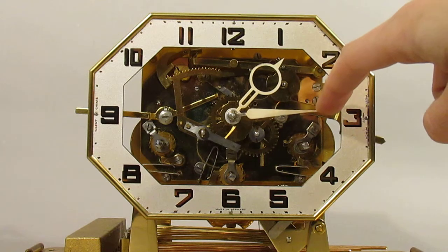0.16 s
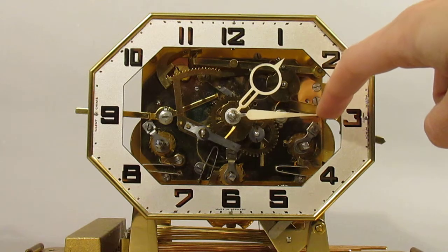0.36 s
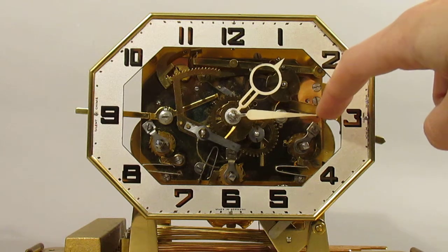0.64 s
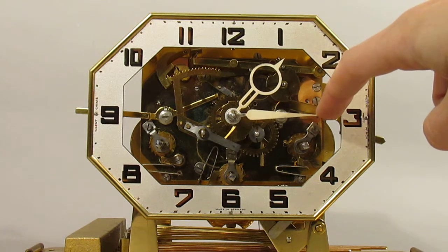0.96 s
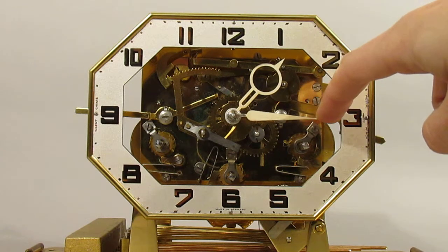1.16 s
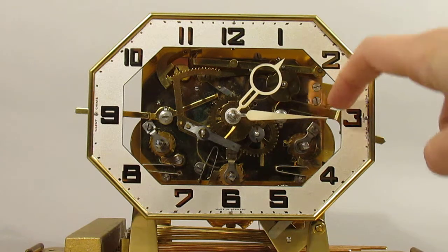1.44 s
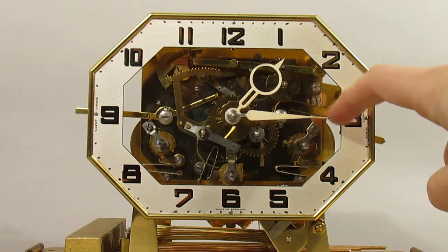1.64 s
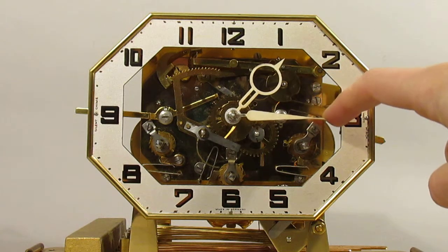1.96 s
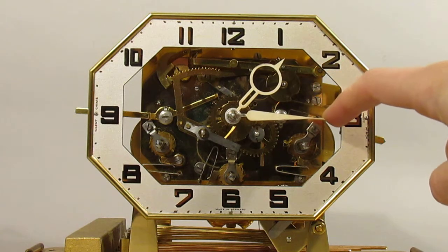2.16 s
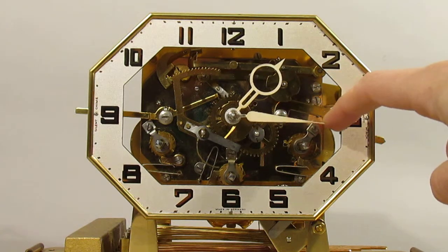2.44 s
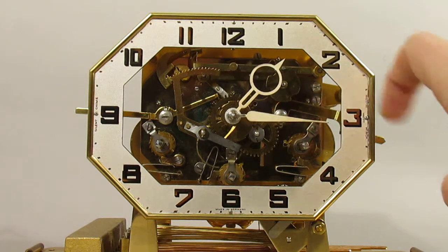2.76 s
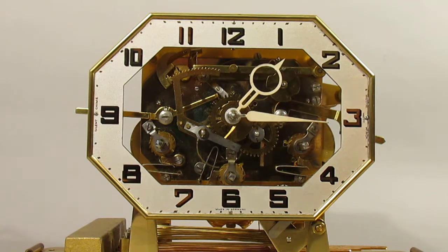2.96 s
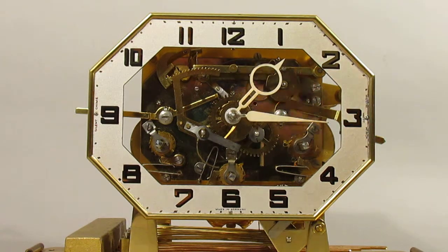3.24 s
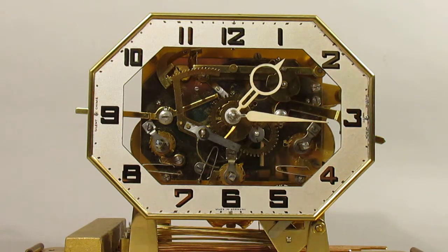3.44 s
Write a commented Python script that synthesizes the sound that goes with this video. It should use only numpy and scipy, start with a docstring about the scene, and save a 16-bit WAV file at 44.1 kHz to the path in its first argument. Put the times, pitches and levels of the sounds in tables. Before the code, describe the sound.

Clock gears released: faint hum and tiny motor ticking, light metal rubs, one crisp click and brief scrape, then an accelerating fine rattle merging into a buzzing whir, close microphone, small quiet room.

```python
"""Clock lever snap and gear-train whir

A finger pushes the minute hand of an open brass clock, close by in a quiet room with a low hum.
The hand rubs softly (grainy filtered noise), then a lever snaps over and scrapes along its cam
(noise bursts, ringing modes, noise). A pawl rattles over a wheel that gathers speed (noise ticks),
and the freed gear train whirs on, ever faster (beats timed by an accelerating phase).
An idling motor ticks faintly throughout."""
import sys
import numpy as np
from scipy import signal
from scipy.fft import rfft, irfft, next_fast_len
from scipy.io import wavfile
from scipy.ndimage import map_coordinates

SR = 44100
rng = np.random.default_rng(int(sys.argv[2]) if len(sys.argv) > 2 else 0)


def unload_wav(signal):
    """Save mono or channel-first audio to the path in sys.argv[1] as 16-bit WAV at rate SR, clipped to [-1, 1]."""
    wavfile.write(
        sys.argv[1],
        SR,
        np.round(np.clip(np.atleast_2d(signal).T, -1, 1) * 32767).astype(np.int16),
    )


N = 158319

# All colours and mode levels are relative; side_db is left over right.
# Room air spectrum: [freq_hz, level_db]
AIR_COLOUR = [(15, -27), (25, -17), (41, -2.5), (52, -7.5), (66, -8), (84, -14), (104, -4), (123, -2),
              (137, -10.5), (152, -14.5), (194, -7.5), (228, -12.5), (276, -11), (361, -17.5), (654, -25.5),
              (1150, -26), (2200, -32.5), (2460, -32), (2660, -35), (9990, -38), (15800, -42)]
# Left-right likeness of the air: [freq_hz, likeness]
AIR_LIKENESS = [(40, 0.64), (130, 0.029), (290, 0.2), (640, -0.16), (1400, -0.082), (3000, 0.014),
                (15000, 0.081)]
# Wavering hum and whine: [centre_hz, rms_db, half_width_hz]
HUM_BANDS = [(40.5, -72, 9.9), (120.8, -63, 5.9), (202, -67, 4.4), (1167, -78.5, 12.5), (2479, -76, 29)]
AIR_RMS_DB = -51.5
MAINS_HZ, MAINS_RMS_DB = 120, -60

MOTOR_FIRST_S, MOTOR_TICKS_PER_S = 0.029, 30
MOTOR_HZ, MOTOR_HALF_WIDTH_HZ, MOTOR_LEVEL_DB, MOTOR_T60_S = 7820, 310, -67.5, 0.019

# Rubs of the hand and its arbor: [peak_s, level_db, rise_s, fall_s, centre_hz, width_octaves]
# rise_s and fall_s: time per 20 dB
RUB_STROKES = [(1.57, -58, 0.058, 0.07, 10600, 0.41), (1.585, -50, 0.0087, 0.01, 11700, .16),
               (1.594, -63, .02, .025, 3950, 0.22), (1.661, -55.5, 0.026, 0.03, 5000, 1.0),
               (1.673, -53.5, 0.03, 0.014, 10800, .025), (1.735, -65.5, 0.015, 0.075, 3920, .4),
               (2.404, -57, 0.028, 0.21, 8800, 0.3), (3.244, -52.5, 0.011, 0.13, 7640, 0.43),
               (3.412, -50, 0.0089, 0.018, 3000, 0.52), (3.585, -52, 0.051, 0.086, 8050, 0.63)]
# Broad part of each rub: [freq_hz, level_db]
RUB_BODY_COLOUR = [(800, -5.5), (2000, -3.5), (3200, -0.5), (4000, 2.5), (5600, -9), (8000, 1),
                   (12500, -10), (15000, -28)]
RUB_BODY_REL_DB = -3.5

# Lever contacts: [start_s, relative_db, side_db]
LEVER_CONTACTS = [(2.3944, -33, -3), (2.4579, -10.5, -1), (2.4598, -23, 4), (2.5046, -27, 1),
                  (2.5098, -28.5, 5)]
# Lever contact spectrum: [freq_hz, level_db]
LEVER_COLOUR = [(290, -38), (500, -20), (988, -16.5), (2150, -23), (3250, -11), (3800, -19), (4300, -9.5),
                (4900, -18), (6140, -3), (6700, -14), (7310, -0.5), (8960, -3), (13400, -4), (15200, -11),
                (16000, -17)]
# Frame modes jolted by the snap: [freq_hz, level_db, t60_s]
FRAME_MODES = [(235.9, -44, 0.33), (309, -42.5, 0.18), (446, -53, 0.091), (617, -59, 0.57),
               (746, -49, 0.079), (893, -56, 0.31), (1047, -55.5, 0.083), (1234, -55, 0.22),
               (2100, -58, 0.18)]
# Hard crack of the lever tip: [freq_hz, level_db, t60_s]
SNAP_MODES = [(9100, -8, 0.002), (12000, -17, .003)]
# Lever sliding on its cam: [time_s, level_db]
SLIDE_LEVEL = [(2.456, -90), (2.461, -50.5), (2.488, -44.5), (2.497, -47.5), (2.511, -47.5), (2.52, -72),
               (2.545, -72), (2.57, -68.5)]
# Slide spectrum: [freq_hz, level_db]
SLIDE_COLOUR = [(240, -28), (400, -16), (616, -7), (1160, -13), (1380, -8.5), (1510, -18), (4180, -7),
                (7060, -25.5), (9040, -10), (14600, -19.5), (16000, -35)]
SNAP_S = 2.4580
LEVER_GAIN_DB, CRACK_T60_S = -4.5, 0.0041
CHATTER_REL_DB, CHATTER_T60_S = -9, 0.019

# Pawl dropping off each tooth: [start_s, relative_db, knock_rel_db]
TOOTH_DROPS = [(2.4476, -28.5, -27.5), (2.4735, -29, -27), (2.4998, -30, -27.5), (2.523, -35, -30),
               (2.545, -31.5, -29), (2.5651, -34, -33), (2.5832, -30.5, -29.5), (2.6006, -31.5, -25),
               (2.6162, -28.5, -28), (2.6299, -32, -24), (2.644, -35, -24), (2.6568, -34, -22),
               (2.6685, -34, -21.5), (2.691, -37.5, -19.5), (2.7014, -37.5, -19.5), (2.7107, -45, -14),
               (2.721, -45.5, -14), (2.731, -55, -11), (2.7462, -52.5, -11)]
# Bright tick spectrum: [freq_hz, level_db]
TOOTH_COLOUR = [(2000, -54), (5500, -15), (6500, -10), (7300, -12), (9300, -11), (9900, 0), (10200, -1),
                (10600, 4), (11100, -10), (11600, -7), (11980, -2), (12250, -4), (12800, -1), (13500, -13),
                (14400, -2), (14900, -5), (15300, -12), (16500, -9)]
# Wheel's dull knock spectrum: [freq_hz, level_db]
KNOCK_COLOUR = [(500, -13), (1800, -10.5), (2600, -1.5), (3150, 5), (3550, -3.5), (4020, 2), (4700, -15),
                (5300, 3), (5900, -8), (6500, -5), (7200, -12), (8300, -3), (16000, -48)]
# Modes rung by each drop: [freq_hz, level_db, t60_s]
PAWL_MODES = [(3183, -14, 0.15), (3960, -17, 0.093), (6650, -6, 0.037), (9950, -5, 0.019),
              (10640, -13, 0.11), (11900, -12, 0.08), (14300, -5, 0.062), (14750, -7, .2)]
# Case shuddering as the train starts: [time_s, relative_db]
SHUDDER_LEVEL = [(2.48, -57), (2.55, -46.5), (2.72, -51.5), (2.82, -58), (2.97, -62)]
# Shudder spectrum: [freq_hz, level_db]
SHUDDER_COLOUR = [(25, -25), (45, -15), (66, -3), (105, 1), (125, -0.5), (150, -10.5), (230, -13),
                  (400, -25.5), (1500, -83.5)]
TOOTH_GAIN_DB, TOOTH_T60_S, TOOTH_REPEAT_SHARE = -2, 0.015, 0.33
KNOCK_GAIN_DB, KNOCK_T60_S, PAWL_RING_GAIN_DB = 7.5, 0.035, -19
# Slower tail of every tooth tick, knock and train beat
PLATE_REL_DB, PLATE_T60_S = -21, 0.09

PING_HZ, PING_DB, PING_PEAK_S = 1407, -50.5, 2.503
PING_SWELL_DB_PER_S, PING_FADE_DB_PER_S = 130, 280

# Train beats: [time_s, relative_db]
WHIR_LEVEL = [(2.76, -67), (2.81, -61), (2.95, -59), (3.08, -59), (3.2, -56.5), (3.37, -57), (3.41, -64),
              (3.48, -60), (3.51, -66), (3.55, -59.5), (3.58, -68)]
# Beat body spectrum: [freq_hz, level_db]
WHIR_COLOUR = [(300, -10), (900, -17.5), (1200, -3.5), (1600, -13), (2080, 0.5), (2370, -10), (2650, 2.5),
               (3080, -2), (3550, 0.5), (3750, -4), (4020, 1), (4280, -2), (4550, 1.5), (5000, -2.5),
               (5320, 0.5), (5520, -20), (8000, -38), (16000, -75)]
# Bright edge of each beat: [freq_hz, level_db]
MESH_COLOUR = [(2000, -17), (5600, -20), (5900, -2), (6300, 2.5), (7550, 0.5), (7850, -11), (8300, -2),
               (8900, -4), (9300, 2), (9750, -1), (10000, -4), (10350, 3), (10600, 1), (11100, 3),
               (11900, 1), (12200, -5), (12700, -11), (13050, -5), (14000, -14), (16000, -40)]
# Train plates rung by each beat: [freq_hz, level_db, t60_s]
WHIR_MODES = [(2090, -9, .05), (2690, -2, .045), (3540, -4, .05), (4000, -8, .04), (5270, -7, .04)]
# Case shaken at the beat rate: [time_s, relative_db]
SHAKE_LEVEL = [(2.75, -72), (2.95, -75), (3.1, -46), (3.22, -52), (3.35, -68), (3.59, -59.5)]
WHIR_START_S, START_BEATS_PER_S = 2.7677, 59.8
SPEED_UP_PER_S2, DRAG_PER_S3 = 186.5, 55
BEAT_T60_S, MESH_T60_S, BEAT_RISE_S = 0.014, 0.013, 0.00046
BEAT_REPEAT_SHARE, BEAT_JITTER_S, BEAT_SCATTER_DB = 0.55, 0.0001, 1.35
WHIR_GAIN_DB, MESH_GAIN_DB, WHIR_RING_GAIN_DB = 10, 8, 0

# Room decay: [freq_hz, t60_s]
ROOM_DECAY = [(200, 0.47), (3000, 0.14), (14000, 0.1)]
ROOM_DB = -13
TOP_HZ = 15950


def amp(db):
    """Decibels to gain."""
    return 10 ** (np.asarray(db) / 20)


def unit(x):
    """Scale to rms 1."""
    return x / np.sqrt(np.mean(x ** 2) + 1e-20)


def clock():
    """Time of each sample, s."""
    return np.arange(N) / SR


def along(points, hz):
    """Interpolate (freq_hz, value) points on a log-frequency axis."""
    point_hz, values = np.transpose(points)
    return np.interp(np.log(hz + 1), np.log(point_hz + 1), values)


def level(rows):
    """Gain per sample from (time_s, level_db) points."""
    return amp(np.interp(clock(), *np.transpose(rows)))


def colour(x, points):
    """Minimum-phase filter through (freq_hz, level_db) points; keeps white-noise power."""
    size = 2 * next_fast_len(N // 2 + SR // 8)
    gain = unit(amp(along(points, np.fft.rfftfreq(size, 1 / SR))))
    cepstrum = irfft(np.log(gain))
    # Fold the cepstrum to make the filter causal
    cepstrum[1:size // 2] *= 2
    cepstrum[size // 2 + 1:] = 0
    return irfft(rfft(x, size) * np.exp(rfft(cepstrum)), size)[..., :N]


def shaped(x, response):
    """Zero-phase filter by a function of frequency in Hz."""
    size = next_fast_len(N + SR // 4)
    return irfft(rfft(x, size) * response(np.fft.rfftfreq(size, 1 / SR)), size)[..., :N]


def noise(alike):
    """Stereo white noise with a given left-right correlation."""
    mid, side = rng.standard_normal((2, N))
    angle = np.arccos(np.clip(alike, -1, 1)) / 2
    return np.cos(angle) * mid + np.sin(angle) * np.array([side, -side])


def pan(db):
    """Left and right gains, db apart."""
    return amp(np.array([[db], [-db]]) / 2)


def grain(rate_hz, depth_db):
    """Random level flutter of rms 1, as of sticking and slipping."""
    knots = rng.standard_normal(int(N * rate_hz / SR) + 4)
    return unit(amp(depth_db * map_coordinates(knots, [clock() * rate_hz], order=1)))


def bursts(times_s, levels_db, t60_s, rise_s):
    """Envelope of contacts that rise quickly and die away; overlaps add in power."""
    power, t = np.zeros(N + SR), np.arange(SR // 10) / SR
    shape = (amp(-60 * t / t60_s) * (1 - np.exp(-t / rise_s))) ** 2
    for start_s, db in zip(times_s, levels_db):
        power[round(start_s * SR):][:len(t)] += amp(db) ** 2 * shape
    return np.sqrt(power[:N])


def ring(modes, times_s, levels_db, spread_rad, rise_s):
    """Decaying modes rung anew by each contact, out of step left to right, levels scattered."""
    out, t = np.zeros((2, N + SR)), np.arange(SR // 3) / SR
    onset = 1 - np.exp(-t / rise_s)
    for start_s, db in zip(times_s, levels_db):
        for hz, mode_db, t60_s in modes:
            phase = rng.uniform(0, 2 * np.pi) + spread_rad * rng.standard_normal((2, 1))
            fade = amp(db + mode_db + rng.normal(0, 2) - 60 * t / t60_s)
            tone = np.sin(2 * np.pi * hz * t + phase)
            out[:, round(start_s * SR):][:, :len(t)] += fade * onset * tone
    return out[:, :N]


def ticks(times_s, levels_db, t60_s, rise_s, alike, repeat_share):
    """Small blows on one part: a share rings alike each time, the rest is fresh grit."""
    t, blows = np.arange(SR // 5) / SR, np.zeros(N + SR)
    blows[np.round(times_s * SR).astype(int)] = amp(levels_db)
    fade = np.hypot(amp(-60 * t / t60_s), amp(PLATE_REL_DB - 60 * t / PLATE_T60_S))
    body = noise(alike)[:, :len(t)] * fade * (1 - np.exp(-t / rise_s))
    same = signal.fftconvolve(blows[None], body, axes=1)[:, :N]
    fresh = bursts(times_s, levels_db, t60_s, rise_s) * noise(alike)
    share = np.clip(repeat_share, 0, 1)
    return np.sqrt(share) * same + np.sqrt(1 - share) * fresh


def background():
    """Room air, a steady mains hum with wavering tones around it, and a faint whine."""
    def angle(hz):
        return np.arccos(np.clip(along(AIR_LIKENESS, hz), -1, 1)) / 2

    def air_response(hz):
        return amp(along(AIR_COLOUR, hz)) * [np.cos(angle(hz)), np.sin(angle(hz))]

    def hum_response(f):
        return sum(amp(db) / np.sqrt(width) / (1 + ((f - hz) / width) ** 2)
                   for hz, db, width in HUM_BANDS)

    mid, side = shaped(rng.standard_normal((2, N)), air_response)
    air = amp(AIR_RMS_DB) * unit(np.array([mid + side, mid - side]))
    hum_rms = np.linalg.norm(amp([db for _, db, _ in HUM_BANDS]))
    hum = hum_rms * unit(shaped(noise(0.49), hum_response))
    mains = amp(MAINS_RMS_DB) * np.sqrt(2) * np.sin(2 * np.pi * MAINS_HZ * clock())
    return pan(db=-0.4) * (air + mains + hum)


def motor():
    """Idling motor: faint even ticks of narrow-band noise."""
    times_s = np.arange(MOTOR_FIRST_S, N / SR, 1 / MOTOR_TICKS_PER_S)
    note = unit(shaped(noise(0.5), lambda f: 1 / (1 + ((f - MOTOR_HZ) / MOTOR_HALF_WIDTH_HZ) ** 2)))
    return note * bursts(times_s, np.full(len(times_s), MOTOR_LEVEL_DB), MOTOR_T60_S, rise_s=0.0005)


def rubs():
    """Short grainy hisses of metal sliding on metal, some narrowed to a squeak."""
    out, t = np.zeros((2, N)), clock()
    for peak_s, db, rise_s, fall_s, hz, octaves in RUB_STROKES:
        stroke = amp(db - 20 * np.maximum((peak_s - t) / rise_s, (t - peak_s) / fall_s))
        squeak = unit(shaped(noise(0.22), lambda f: np.exp(-(np.log2((f + 1) / hz) / octaves) ** 2 / 2)))
        body = amp(RUB_BODY_REL_DB) * colour(noise(0.33), RUB_BODY_COLOUR)
        out += stroke * unit(squeak + body)
    return out * grain(500, depth_db=2.5)


def lever():
    """Each contact cracks and chatters; the snap rings the frame and the lever scrapes on."""
    force = np.zeros((2, N))
    for start_s, db, side_db in LEVER_CONTACTS:
        crack = bursts([start_s], [db], CRACK_T60_S, rise_s=0.0001)
        chatter = bursts([start_s], [db + CHATTER_REL_DB], CHATTER_T60_S, rise_s=0.00057)
        force += pan(side_db) * np.hypot(crack, chatter)
    clicks = amp(LEVER_GAIN_DB) * colour(force * noise(0.6), LEVER_COLOUR)
    slide = colour(level(SLIDE_LEVEL) * grain(600, depth_db=0.5) * noise(0.66), SLIDE_COLOUR)
    tip = pan(db=6) * ring(SNAP_MODES, [SNAP_S], [0], spread_rad=0.24, rise_s=0.00016)
    frame = ring(FRAME_MODES, [SNAP_S], [0], spread_rad=0.42, rise_s=0.0034)
    return clicks + tip + slide + frame


def pawl():
    """A bright tick, a duller knock and a short ring per tooth, over a shudder of the case."""
    times_s, db, knock_db = np.transpose(TOOTH_DROPS)
    bright = ticks(times_s, db + TOOTH_GAIN_DB, TOOTH_T60_S, rise_s=0.00068,
                   alike=0.28, repeat_share=TOOTH_REPEAT_SHARE)
    knocks = ticks(times_s, db + knock_db + KNOCK_GAIN_DB, KNOCK_T60_S, rise_s=0.00043,
                   alike=0.97, repeat_share=TOOTH_REPEAT_SHARE)
    rings = ring(PAWL_MODES, times_s, db + PAWL_RING_GAIN_DB, spread_rad=1.0, rise_s=0.0005)
    shudder = level(SHUDDER_LEVEL) * colour(noise(0.85), SHUDDER_COLOUR)
    treble = pan(db=3.5) * (colour(bright, TOOTH_COLOUR) + rings)
    return treble + colour(knocks, KNOCK_COLOUR) + pan(db=6) * shudder


def hand():
    """The minute hand's own note sings up while the lever scrapes, then dies away."""
    t = clock() - PING_PEAK_S
    swell_db = np.minimum(PING_SWELL_DB_PER_S * t, -PING_FADE_DB_PER_S * t)
    swell = amp(PING_DB + swell_db) * (clock() > SNAP_S)
    return swell * np.sin(2 * np.pi * PING_HZ * t + 0.46 * rng.standard_normal((2, 1)))


def whir():
    """The running train beats once a turn, shakes the case and speeds up against drag."""
    age_s = np.maximum(clock() - WHIR_START_S, 0)
    running = age_s > 0
    beats_per_s = START_BEATS_PER_S + SPEED_UP_PER_S2 * age_s - DRAG_PER_S3 * age_s ** 2
    turns = np.cumsum(beats_per_s * running) / SR
    times_s = clock()[np.flatnonzero(np.diff(np.ceil(turns)))]
    late, strong = rng.standard_normal((len(times_s), 2)).T
    db = np.interp(times_s, *np.transpose(WHIR_LEVEL)) + BEAT_SCATTER_DB * strong
    times_s = times_s + BEAT_JITTER_S * late
    body = ticks(times_s, db + WHIR_GAIN_DB, BEAT_T60_S, BEAT_RISE_S,
                 alike=0.75, repeat_share=BEAT_REPEAT_SHARE)
    mesh = ticks(times_s, db + MESH_GAIN_DB, MESH_T60_S, BEAT_RISE_S,
                 alike=0.32, repeat_share=BEAT_REPEAT_SHARE)
    shake = level(SHAKE_LEVEL) * running * np.sin(2 * np.pi * turns)
    plates = ring(WHIR_MODES, times_s, db + WHIR_RING_GAIN_DB, spread_rad=0.35, rise_s=0.00095)
    beats = pan(db=-0.8) * (colour(body, WHIR_COLOUR) + plates)
    return beats + pan(db=3) * colour(mesh, MESH_COLOUR) + pan(db=4) * shake


def room(x):
    """The small room's answer: decaying noise after 4 ms, shorter in the treble."""
    hz, t, bins = signal.stft(rng.standard_normal((2, SR // 2)), SR, nperseg=256)
    decay = amp(-60 * t / along(ROOM_DECAY, hz)[:, None])
    tail = signal.istft(bins * decay, SR, nperseg=256)[1]
    tail = np.pad(tail / np.linalg.norm(tail[0]), ((0, 0), (SR // 250, 0)))
    return signal.fftconvolve(x, tail, axes=1)[:, :N]


def scene():
    """The clockwork in its room."""
    works = motor() + rubs() + lever() + pawl() + hand() + whir()
    return background() + works + amp(ROOM_DB) * room(works)


def record(dry):
    """Band limit: nothing passes at or above TOP_HZ."""
    return shaped(dry, lambda hz: hz < TOP_HZ)


dry = scene()
out = record(dry)
unload_wav(out)
```